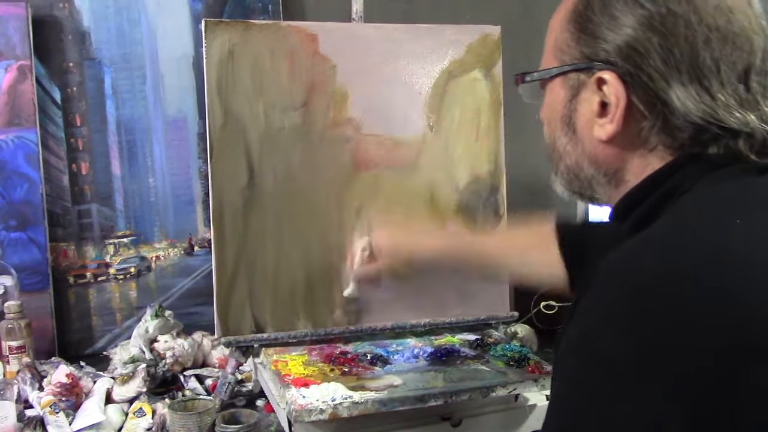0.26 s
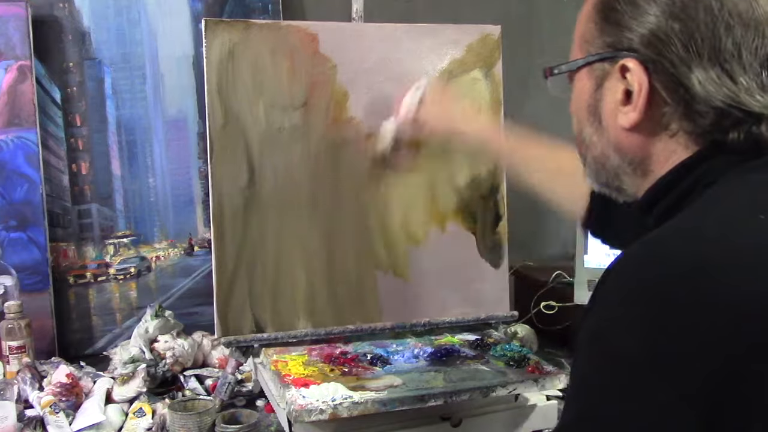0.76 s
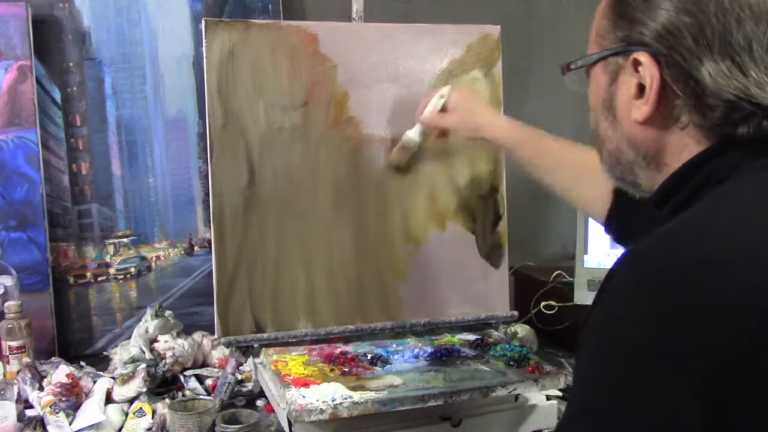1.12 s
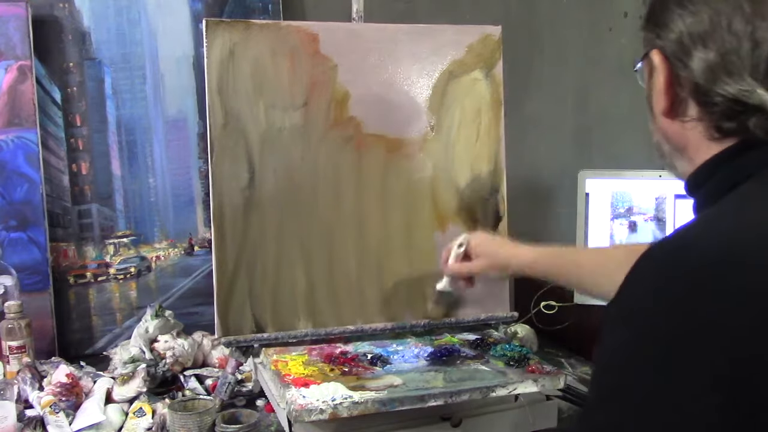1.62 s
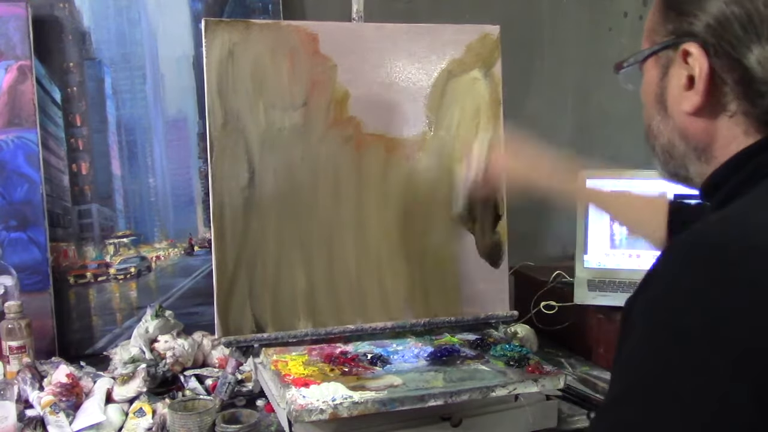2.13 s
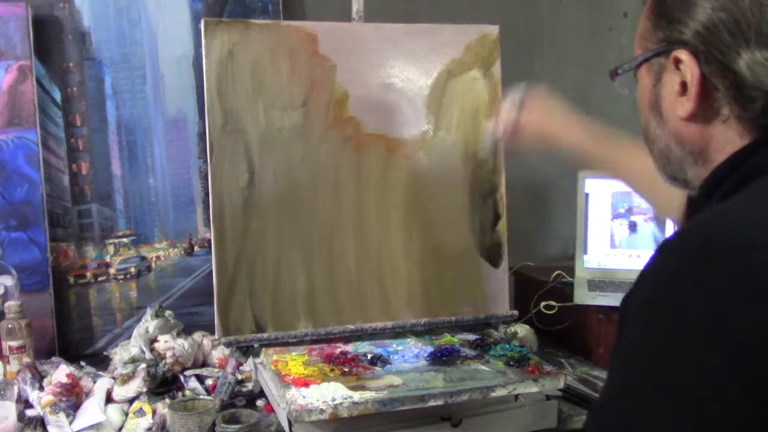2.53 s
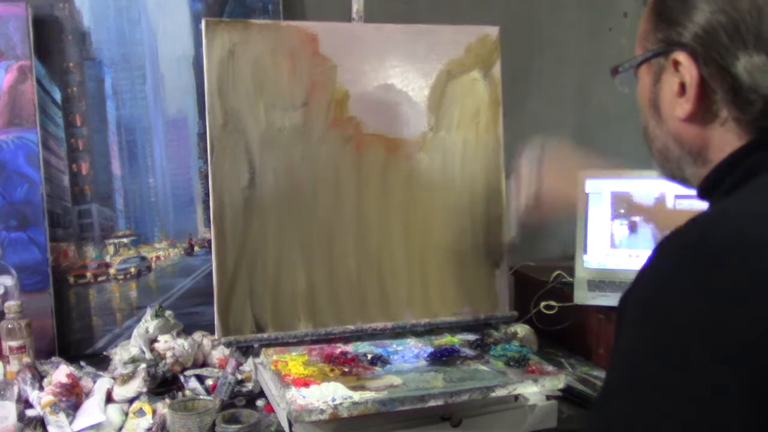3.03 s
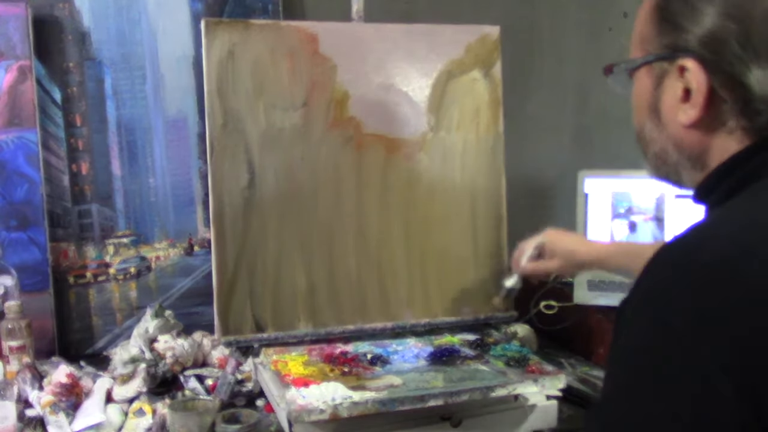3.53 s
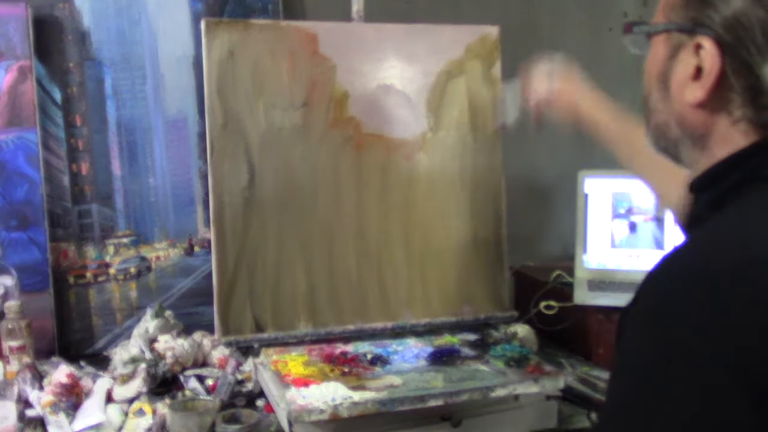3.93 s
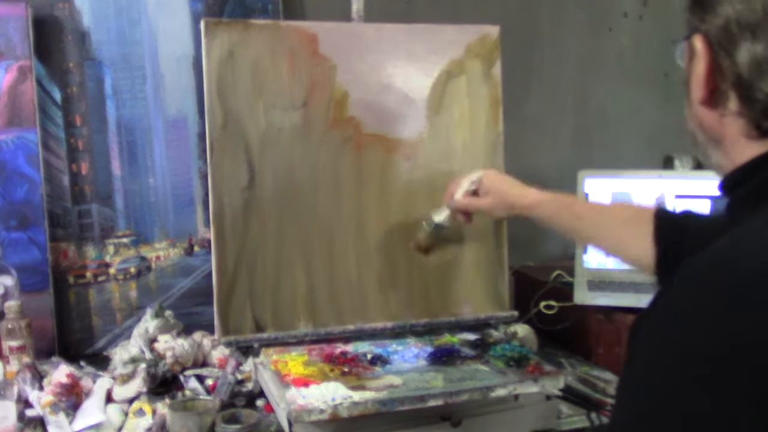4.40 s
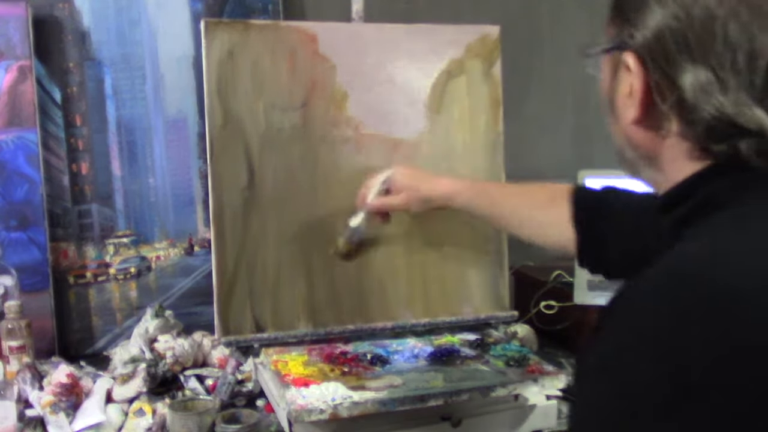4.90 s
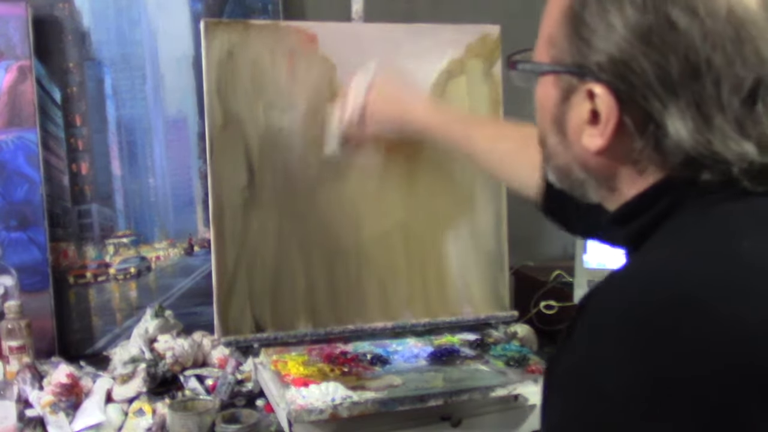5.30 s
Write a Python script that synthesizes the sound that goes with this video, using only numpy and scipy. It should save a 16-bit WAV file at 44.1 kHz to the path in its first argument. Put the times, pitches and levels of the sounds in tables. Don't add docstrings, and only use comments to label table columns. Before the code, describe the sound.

A wide bristle brush scrubs a stretched canvas in fast up-and-down strokes, hissing and drumming, with a few knocks, then lighter dabs.

```python
import sys
import numpy as np
from scipy import signal
from scipy.fft import rfft, irfft
from scipy.io import wavfile
from scipy.ndimage import uniform_filter1d

SR = 44100
rng = np.random.default_rng(int(sys.argv[2]) if len(sys.argv) > 2 else 0)


def generate_wav(signal):
    frames = np.transpose(np.atleast_2d(signal))
    scaled = np.clip(frames, -1, 1) * 32767
    pcm = np.round(scaled).astype(np.int16)
    wavfile.write(sys.argv[1], SR, pcm)


def voltage_ratio(level):
    return 10 ** (np.asarray(level, float) / 20)


N = 244755
T = np.arange(N) / SR


def evened(x):
    return x / np.sqrt(np.mean(x ** 2) + 1e-20)


def read(points, hz):
    f, value = np.transpose(points)
    return np.interp(np.log(hz + 1), np.log(f + 1), value)


def follow(points):
    return np.interp(T, *np.transpose(points))


def coloured(points):
    hz = np.fft.rfftfreq(N, 1 / SR)
    spectrum = rfft(rng.standard_normal(N)) * voltage_ratio(read(points, hz))
    return evened(irfft(spectrum, N))


def resonate(x, hz, width):
    turn = np.exp(2j * np.pi * np.cumsum(hz * np.ones(len(x))) / SR)
    r = np.exp(-np.pi * width / SR)
    return 2 * (turn * signal.lfilter([1 - r], [1, -r], x / turn)).real


def resonate_twice(x, hz, width, hz_2, width_2):
    return resonate(resonate(x, hz, width), hz_2, width_2)


def patchy(shape, bins, frames):
    field = uniform_filter1d(rng.standard_normal(shape), bins, axis=0)
    return evened(uniform_filter1d(field, frames, axis=1))


# frequency in Hz, density in dB per Hz.
AIR = [(25, -34), (60, -15), (200, -1), (450, 2), (900, -2.5), (1500, -22), (5000, -60), (10000, -35),
       (15600, -47)]


def studio_air():
    return voltage_ratio(-57) * coloured(AIR)


# frequency in Hz, density in dB per Hz.
WIDE = [(15, -52), (25, -36), (113, -7), (394, -4), (977, -21), (1080, -26), (1310, -27), (1500, -33),
        (1950, -63), (3300, -120)]


def wide_air():
    return voltage_ratio(-66) * coloured(WIDE)


# frequency in Hz, t60 in seconds.
STUDIO = [(200, 0.11), (1000, 0.15), (4000, 0.17), (12000, 0.064)]


def studio(x):
    taps = np.zeros((2, SR // 2))
    at = np.arange(300, SR // 2 - 20, 20)
    at = at + rng.integers(0, 20, (2, len(at)))
    np.put_along_axis(taps, at, rng.choice([-1., 1.], at.shape), 1)
    hz, t, z = signal.stft(taps, SR, nperseg=256)
    decay = voltage_ratio(-60 * t / read(STUDIO, hz)[:, None])
    tail = signal.istft(z * decay, SR, nperseg=256)[1]
    return signal.fftconvolve(x[None], tail / np.linalg.norm(tail[0]), axes=1)[:, :N]


# start in seconds, rock level in dB, shove level in dB, shove lag in seconds.
THUDS = [(-.01, -64, -52, 0.0022), (.29, -55, -41, 0.041), (.63, -52, -37.5, 0.017), (.98, -54, -44, 0.089),
         (1.31, -53, -44.5, 0.02), (1.66, -51, -39, 0.0078), (2.035, -55, -41.5, 0.0042),
         (2.28, -70, -50, 0.0043), (2.41, -55, -39, 0.0058), (2.78, -60, -41.5, .005),
         (3.15, -52, -40.5, 0.012), (3.57, -60, -43.5, 0.011), (4.64, -74, -52, 0.011),
         (4.9, -72, -53, .01), (5.19, -72, -59, 0.0087), (5.35, -72, -55, .01)]


def thuds():
    out = np.zeros(N)
    for s, rock_db, _, _ in THUDS:
        swing = np.sin(2 * np.pi * 52 * (T - s))
        out += voltage_ratio(rock_db) * swing * np.exp(-((T - s) / 0.013) ** 2)
    return out


def shoves(fade_s):
    s, _, shove_db, lag = np.transpose(THUDS)[:, :, None]
    t = np.linspace(0, T[-1], num=2000)
    late = t - s - lag
    rise_s = 0.027 + 0.97 * lag
    shape = np.where(late < 0, np.exp(-(late / rise_s) ** 2), np.exp(-abs(late) / fade_s))
    return np.interp(T, t, (voltage_ratio(shove_db) * shape).sum(axis=0))


def cloth(x, modes):
    out = np.zeros(N)
    for i, (hz, width, db) in enumerate(modes):
        out += (-1) ** i * voltage_ratio(db) * resonate_twice(x, hz, width, hz, 2 * width)
    return evened(out)


# frequency in Hz, width in Hz, level in dB.
CLOTH = [(215, 110, -9), (350, 90, -4), (450, 80, -4), (540, 130, -1.5), (660, 150, -3), (800, 140, -3),
         (1000, 220, -8)]
# start in seconds, blow in dB, tick in dB, pitch factor, cloth ring in dB.
KNOCKS = [
    (1.631, -23.5, 1, 1.06, -10),
    (2.008, -14, 1, 0.99, -14),
    (2.3819, -17.5, -2, 0.97, -10),
    (2.749, -22.5, -1, 1.0, -11),
    (3.1141, -21.5, 3.5, 0.967, -8),
    (3.1245, -27, -4, 0.84, -10),
]
# delay in seconds, frequency in Hz, length in cycles, level in dB.
ARRIVALS = [(.0012, 1580, 3.3, -5.5), (.0058, 476, 1.2, -4.5), (.0062, 1520, 10, -13),
            (.0115, 620, 4.6, -0.8), (0.0151, 470, 1.7, -10.5), (.018, 208, 1.5, -16),
            (.0225, 560, 2.3, -24), (.0285, 420, 2.3, -4.5), (.034, 402.4, 0.73, -19),
            (.038, 415, 1.6, -23.5)]


def knocks():
    out, shake, rattle = np.zeros((3, N))
    t = np.arange(8000) / SR
    for s, blow_db, tick_db, pitch, ring_db in KNOCKS:
        hit = voltage_ratio(tick_db) * np.sin(2 * np.pi * 2600 * t) * np.exp(-t / .0006)
        for delay, hz, cycles, db in ARRIVALS:
            packet = np.exp(-((t - delay) * hz * 2 / cycles) ** 2)
            hit += voltage_ratio(db) * np.sin(2 * np.pi * hz * pitch * (t - delay)) * packet
        at = round(s * SR)
        here = slice(at, at + len(t))
        out[here] += voltage_ratio(blow_db) * hit
        rattle[here] += voltage_ratio(blow_db + tick_db - 11 - 60 * t / .08)
        shake[here] += voltage_ratio(blow_db + ring_db - 60 * t / 0.21) * (1 - np.exp(-t / 0.0044))
    wood = evened(resonate_twice(rng.standard_normal(N), 2100, 1400, 1900, 1800))
    out = signal.sosfilt(signal.butter(2, 170, "high", fs=SR, output="sos"), out)
    return out + rattle * wood + shake * cloth(rng.standard_normal(N), CLOTH)


# start in seconds, length in seconds, from Hz, to Hz, level in dB.
STRAYS = [
    (0.501, 0.051, 1430, 1490, -39),
    (0.656, 0.035, 2200, 2130, -36),
    (1.257, 0.025, 2400, 1910, -39),
    (1.405, 0.19, 780, 780, -51),
    (1.607, 0.017, 2100, 1590, -30.5),
    (3.918, .04, 2120, 2250, -41),
    (5.258, 0.017, 3130, 1920, -47),
    (5.368, 0.12, 3230, 1640, -39.5),
]


def strays():
    hz, gain = np.full(N, 1000.), np.zeros(N)
    for s, length, from_hz, to_hz, db in STRAYS:
        along = (T - s) / length
        on = (along > 0) & (along < 1)
        hz = np.where(on, from_hz + (to_hz - from_hz) * along, hz)
        gain = gain + on * voltage_ratio(db) * np.sin(np.pi * along)
    return gain * evened(resonate_twice(rng.standard_normal(N), hz, 240, hz, 270))


# turn in seconds, share of the
# stroke at full pressure 0-1, full hiss in dB, threads crossed at top speed in Hz, weave tone in dB.
PULLS = [(0.121, 0.69, -26.5, 3810, -16), (0.474, 0.74, -26, 3890, -12.5), (0.816, 0.67, -27, 3790, -15.5),
         (1.154, 0.73, -27, 3740, -16), (1.495, 0.79, -28, 3590, -14), (1.869, 0.72, -26.5, 3940, -20),
         (2.237, 0.76, -26.5, 3200, -10.5), (2.592, 0.76, -28, 3690, -9.5),
         (2.96, 0.47, -26.5, 3520, -11.5), (3.349, 0.5, -26, 3130, -17.5), (3.827, 0.58, -33, 2780, -15.5),
         (5.178, 0.81, -34.5, 2900, -17)]
RETURNS = [(-0.05, 0.27, -28.5, 2670, -20), (0.29, 0.37, -28.5, 2660, -16), (0.637, 0.45, -28, 2860, -28),
           (0.983, 0.46, -30.5, 3330, -21.5), (1.309, 0.17, -29.5, 2700, -21.5),
           (1.67, 0.27, -31.5, 2730, -24), (2.042, 0.32, -28.5, 2630, -23),
           (2.41, 0.17, -28.5, 2820, -10.5), (2.776, 0.49, -27, 2920, -25), (3.148, 0.24, -27, 3600, -17),
           (3.552, 0.16, -27.5, 3300, -25)]
FLICKS = [
    (4.083, 0.27, -33.5, 2560, -7.5),
    (4.24, .65, -31.5, 2800, -16),
]
DABS = [
    (4.429, 0.48, -36.5, 3050, -25),
    (4.522, 0.54, -34.4, 3500, -19),
    (4.642, 0.78, -34, 2640, -19),
    (4.769, 0.81, -34, 2800, -20.5),
    (4.904, 0.27, -35, 2420, -22),
    (5.345, 0.32, -32, 2850, -32),
]
# dip at the turn in dB, share at top speed 0-1, rise power, fall power,
# drag in dB.
HABITS = [
    (-20.5, 0.65, 1.41, 1.14, 2.5),
    (-12.5, 0.47, 0.93, 1.43, 0.6),
    (-10.5, 0.53, 1.07, 1.07, 0),
    (-10.5, 0.58, 2.6, 1.5, 0.3),
]
# drumming at the start in dB, at the end in dB.
BITE = [
    (4, -1.5),
    (-1, -9.5),
    (-1.5, -0.2),
    (-3.5, -3.5),
]


def strokes():
    rows = []
    for kind, habit, bite in zip((PULLS, RETURNS, DABS, FLICKS), HABITS, BITE):
        rows += [row + habit + bite for row in kind]
    rows = np.array(rows)
    return rows[np.argsort(rows[:, 0])].T


# time in seconds, hiss in dB.
LAST_TURN = (5.516, -42)


def stroke_phase():
    turns = np.append(strokes()[0], LAST_TURN[0])
    place = np.interp(T, turns, np.arange(len(turns)))
    place = np.clip(place, 0, len(turns) - 1 - 1e-9)
    return place.astype(int), place % 1


def arch(along, top):
    top = np.clip(top, .05, .95)
    return np.sin(np.pi / 2 * np.where(along < top, along / top, (1 - along) / (1 - top)))


def pressure(k, along):
    s, top, full_db, _, _, dip_db, _, rise, fall = strokes()[:9]
    fall = fall * (1 + 5.6 * np.maximum(top - 0.58, 0))
    before_db = np.append(full_db[0], full_db[:-1])
    turn_db = dip_db + (full_db + before_db) / 2
    rustle_db = np.interp(T, np.append(s, LAST_TURN[0]), np.append(turn_db, LAST_TURN[1]))
    swing = arch(along, top[k])
    power = np.where(along < top[k], rise[k], fall[k])
    return voltage_ratio(rustle_db) * (1 - swing) + voltage_ratio(full_db[k]) * swing ** power


# time in seconds, level in dB.
SLACK = [(0, -7), (.3, -7), (1.2, -8), (1.6, -8), (2.3, -7.5), (2.7, -12), (3.0, -19.5), (3.5, -26),
         (3.9, -19.5), (4.3, -8), (4.7, -10), (5.55, -13.5)]
# frequency in Hz, width in Hz, level in dB.
UNDER_BRUSH = [(507, 83, -6), (684, 200, -8.5), (780, 107, -2), (1033, 250, -7)]
# frequency in Hz, density in dB per Hz.
SAG = [(20, -30), (35, -11), (55, -12), (80, -15), (130, -0.5), (165, 1.5), (200, -1.5), (260, -55)]


def rumble(k, along, level):
    start_db, end_db = strokes()[-2:]
    bite_db = uniform_filter1d(start_db[k] + (end_db - start_db)[k] * along, size=900)
    drum = voltage_ratio(follow(SLACK) - 29.5) * (level / voltage_ratio(-25.5)) ** 0.41
    upper = drum * voltage_ratio(0.54 * bite_db)
    lower = voltage_ratio(-12 + 1.6 * bite_db) * drum + shoves(fade_s=0.058)
    sag = voltage_ratio(-24.5) * drum + voltage_ratio(-9) * shoves(fade_s=0.081)
    unevenness = evened(uniform_filter1d(rng.standard_normal(N), size=500))
    jolts = rng.standard_normal(N) * voltage_ratio(2.37 * unevenness)
    out = voltage_ratio(-3.0) * upper * cloth(jolts, UNDER_BRUSH)
    out += voltage_ratio(-2.0) * lower * cloth(jolts, CLOTH[:3])
    return out + voltage_ratio(-4.5) * sag * coloured(SAG)


# time in seconds, narrow tone in dB, halo in dB.
FOCUS = [(0, -4.5, 0), (1.6, 0.5, -2), (1.8, 1, -2), (2.0, -2, 7.5), (2.5, -17, -5), (2.7, -6, 3),
         (2.9, -2, -11), (3.1, -20, 1.5), (3.3, -11, -1), (3.65, 0, 9.5), (4.0, -6, 3.5), (4.15, -14, -6),
         (4.35, -2, 3.5), (5.0, -10, 3.5), (5.3, -1, 3), (5.45, -12, 5)]


def weave(k, along, level):
    _, _, _, top_hz, tone_db, _, top = strokes()[:7]
    s, core_db, halo_db = np.transpose(FOCUS)
    speed = arch(along, top[k])
    hz = top_hz[k] * (0.0082 + speed)
    a, b, c = rng.standard_normal((3, N))
    catch = voltage_ratio(evened(uniform_filter1d(rng.standard_normal(N), size=900)))
    catch = catch * 1.4 * speed ** 3
    core = catch * evened(resonate_twice(a, hz, 130, hz, 170))
    halo = evened(resonate_twice(b, 1.03 * hz, 1670, 1.02 * hz, 1670))
    overtone = evened(resonate_twice(c, 2 * hz, 900, 2 * hz, 900))
    gain = voltage_ratio(uniform_filter1d(tone_db[k], size=400) + 9) * speed ** 1.2
    clear = voltage_ratio(np.interp(T, s, core_db)) * (core + voltage_ratio(0.5) * overtone)
    return level * gain * (clear + voltage_ratio(np.interp(T, s, halo_db)) * halo)


# frequency in Hz, density in dB per Hz.
BRISTLES = [(180, -34), (300, -14.5), (446, -23.5), (600, -10), (674, -16), (864, -12), (1460, -3.5),
            (1620, -6), (3760, -1.5), (4220, -1.5), (9630, -0.5), (15600, -11)]
# time in seconds, dryness in dB.
DRYNESS = [(0, 1.5), (1.2, 0.9), (2.6, 1), (2.9, -3), (3.4, -6.5), (3.65, -1.5), (4.3, -1), (4.9, 0.5),
           (5.25, 4.5), (5.5, 1.5)]


def bristles(k, along, level):
    slips = rng.standard_normal(N) * voltage_ratio(1.1 * rng.exponential(1, N))
    hz, t, z = signal.stft(slips, SR, nperseg=512, noverlap=384)
    tips_db = follow(DRYNESS)
    drag_db = uniform_filter1d(strokes()[9][k], size=900) + 0.94 * np.minimum(tips_db, 0)
    effort_db = 20 * np.log10(level) + 22
    octave = np.log2(hz[:, None] + 1)
    body_db = np.exp(-((octave - 10.8) / 1.04) ** 2) * np.interp(t, T, drag_db - 0.24 * effort_db)
    bright_db = tips_db + (0.1 - 0.013 * tips_db) * effort_db + 1.1 * (along - .5)
    sparkle_db = np.clip(octave - 12.6, 0, 2) * np.interp(t, T, bright_db)
    clumps_db = .8 * patchy(z.shape, bins=24, frames=5)
    streaks_db = 1.4 * patchy(z.shape, bins=2, frames=14)
    z = z * voltage_ratio(read(BRISTLES, hz)[:, None] + body_db + sparkle_db + clumps_db + streaks_db)
    hiss = signal.istft(z, SR, nperseg=512, noverlap=384)[1][:N]
    return voltage_ratio(1.18) * level * evened(hiss)


def scene():
    k, along = stroke_phase()
    level = pressure(k, along)
    brush = thuds() + knocks() + strays()
    brush += rumble(k, along, level) + weave(k, along, level) + bristles(k, along, level)
    same, other = studio(brush)
    mid = brush + voltage_ratio(-12.5) * same + studio_air()
    side = voltage_ratio(-32.0) * other + wide_air()
    return np.array([mid + side, mid - side])


def low_pass(x):
    return signal.sosfilt(signal.butter(12, 15700, fs=SR, output="sos"), x)


def record(dry):
    rolled = signal.sosfilt(signal.butter(2, 42, "high", fs=SR, output="sos"), dry)
    return low_pass(rolled)


dry = scene()
out = record(dry)
generate_wav(out)
```